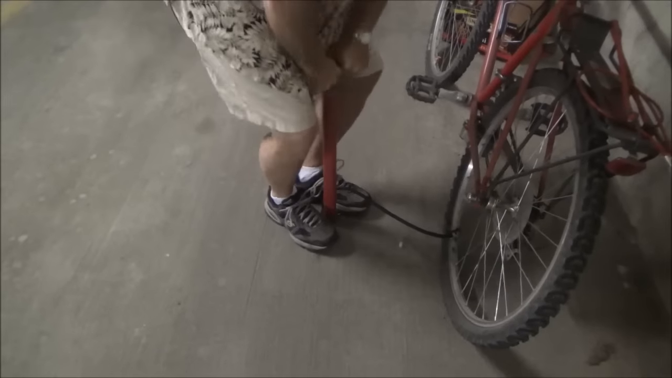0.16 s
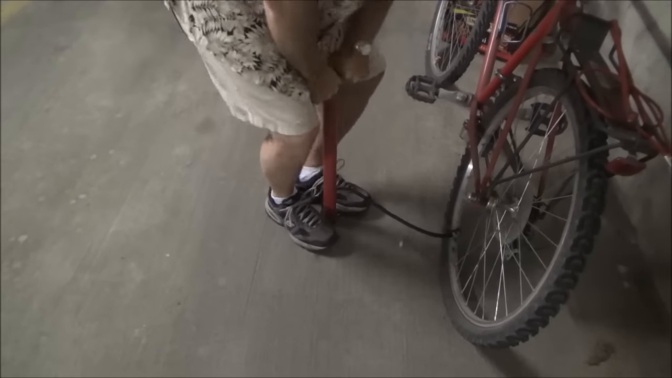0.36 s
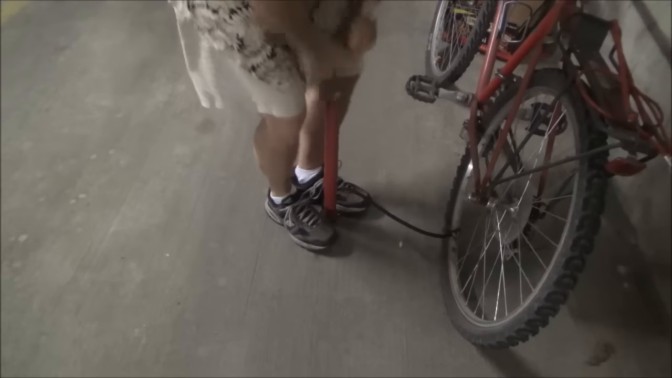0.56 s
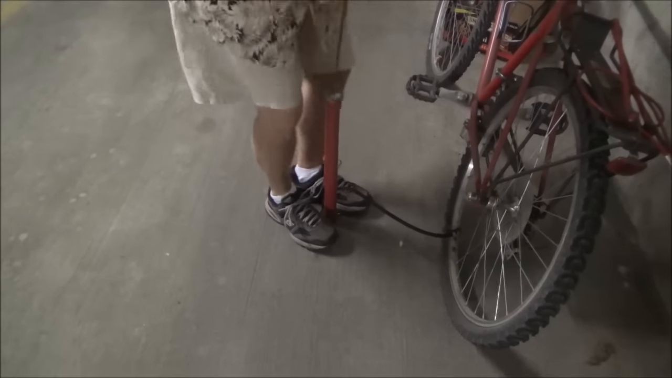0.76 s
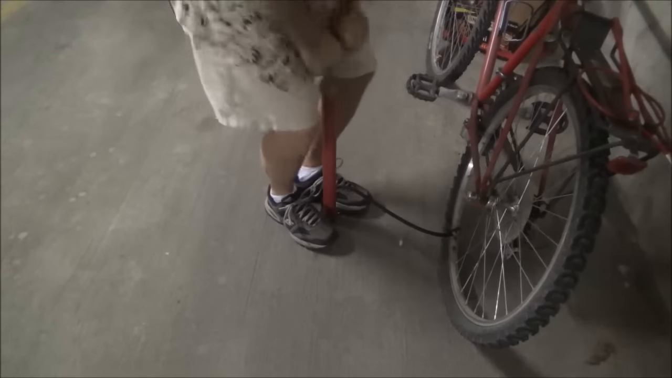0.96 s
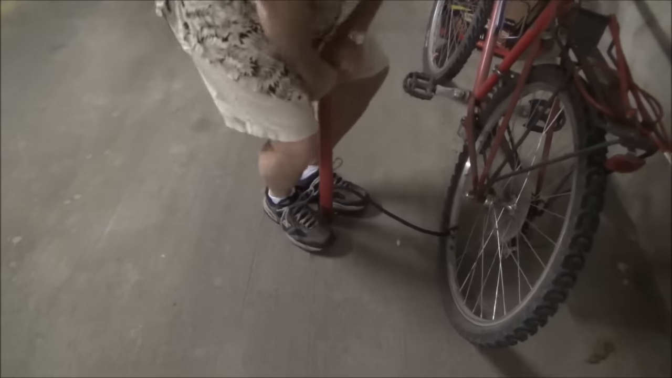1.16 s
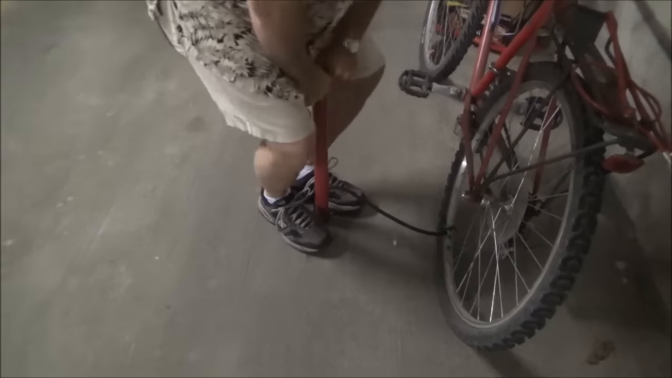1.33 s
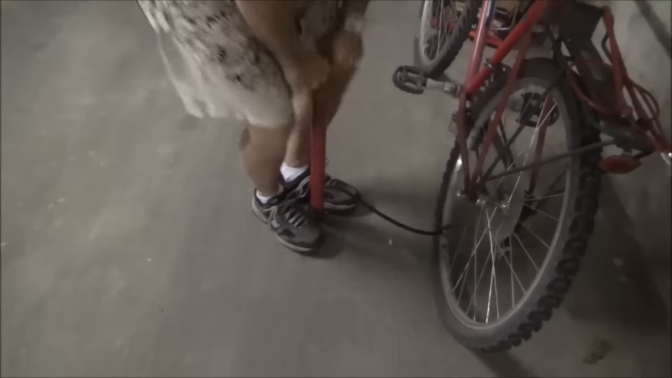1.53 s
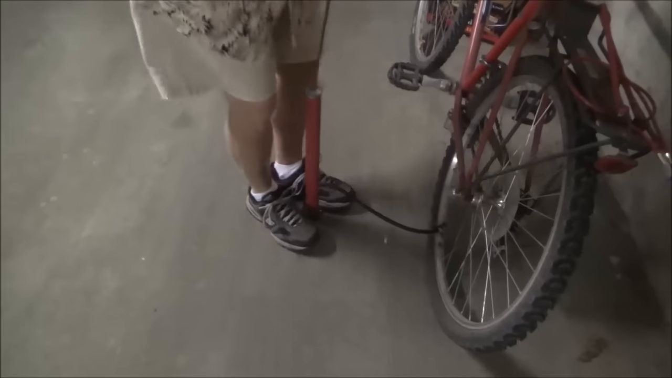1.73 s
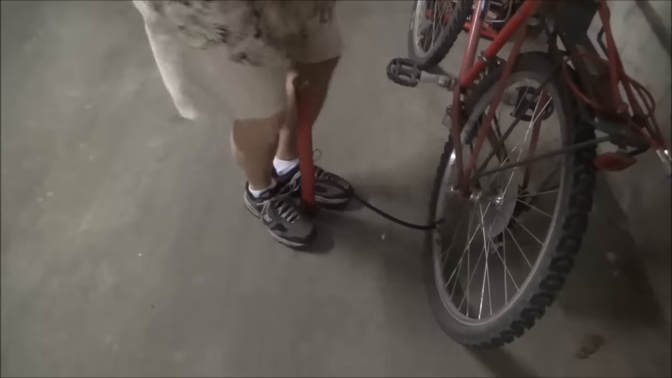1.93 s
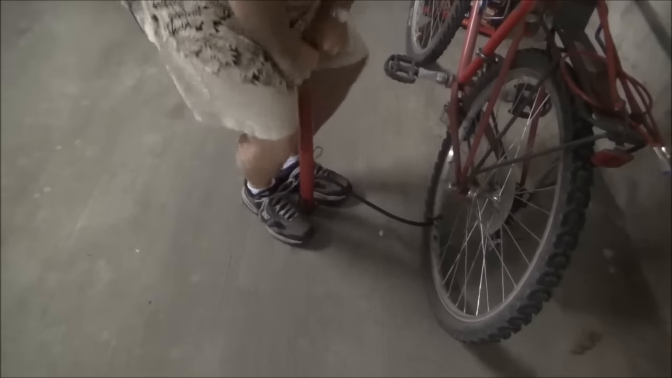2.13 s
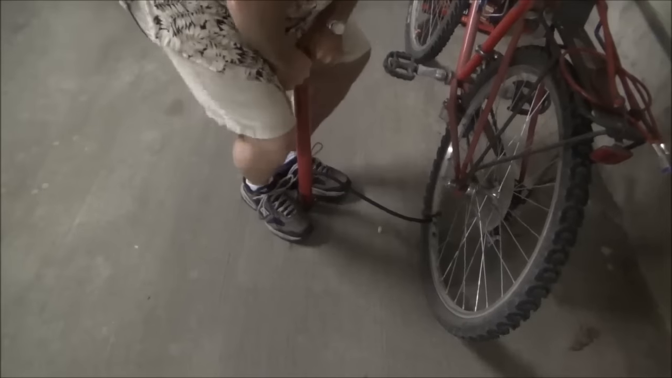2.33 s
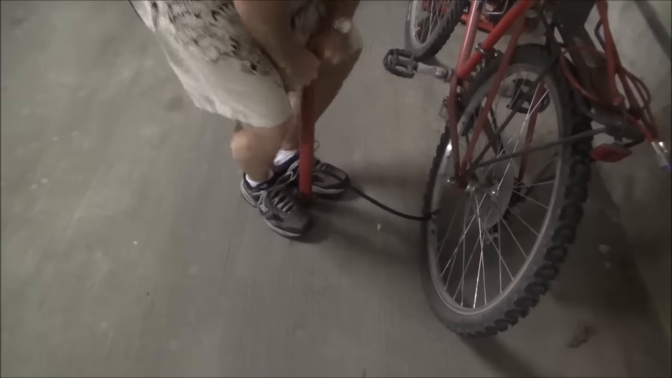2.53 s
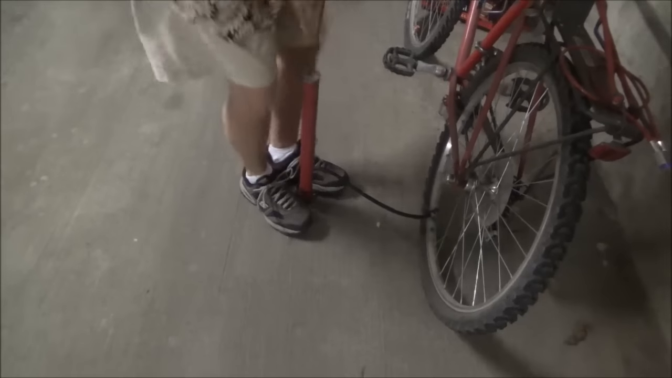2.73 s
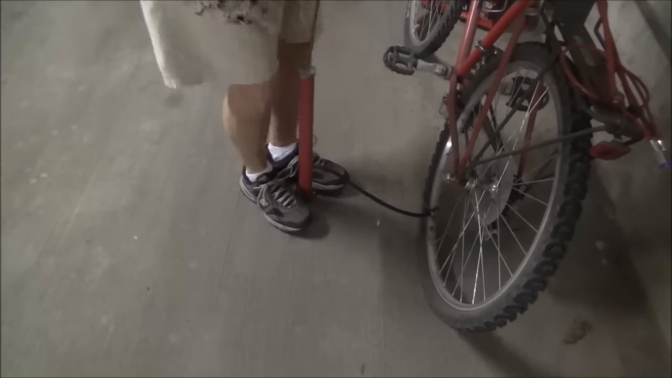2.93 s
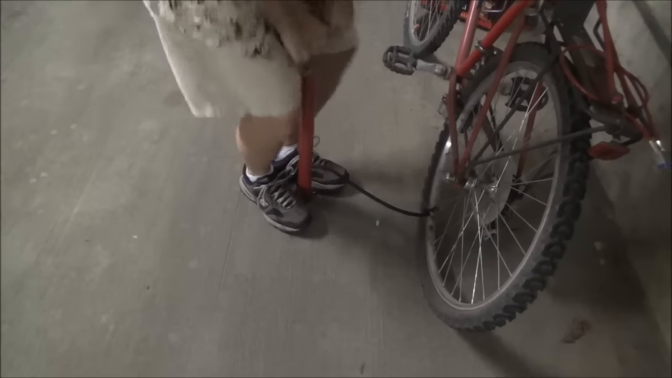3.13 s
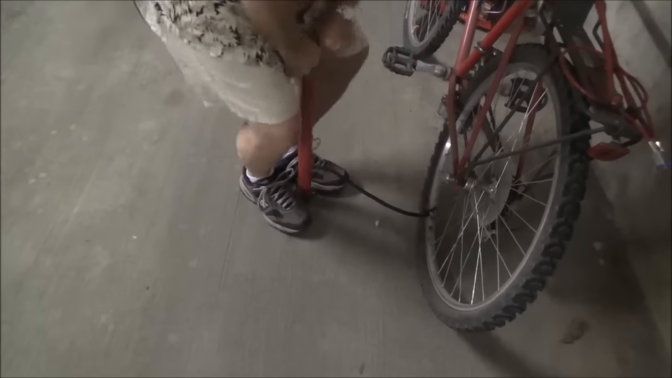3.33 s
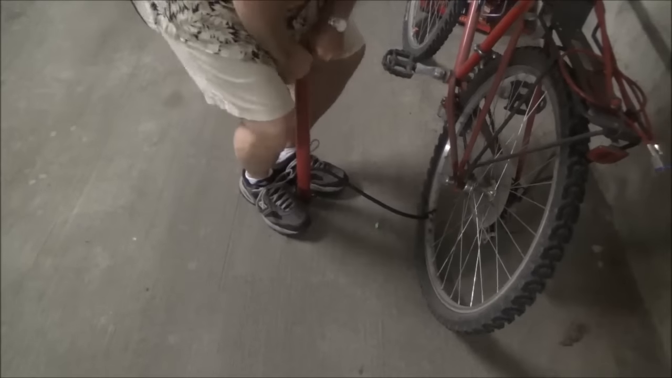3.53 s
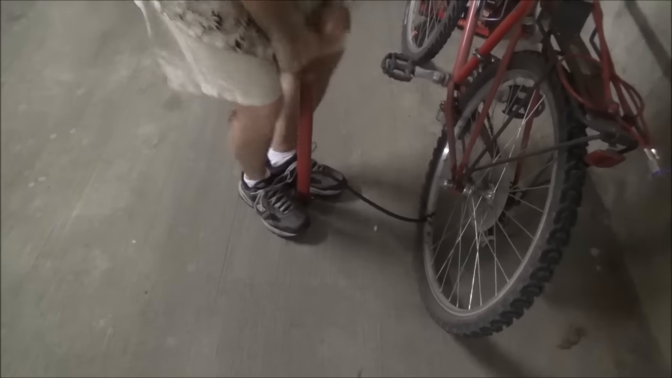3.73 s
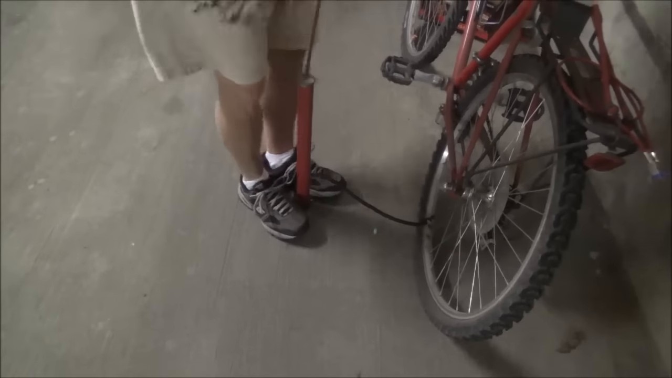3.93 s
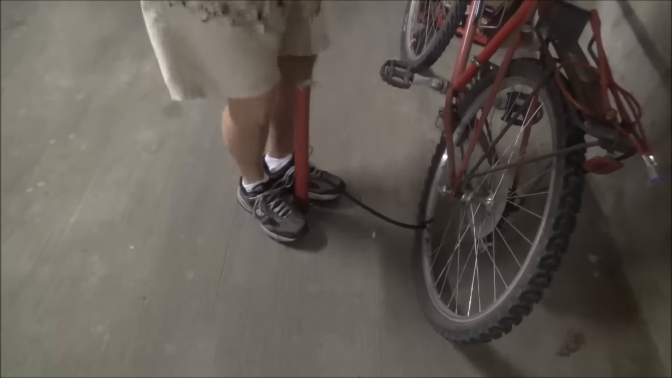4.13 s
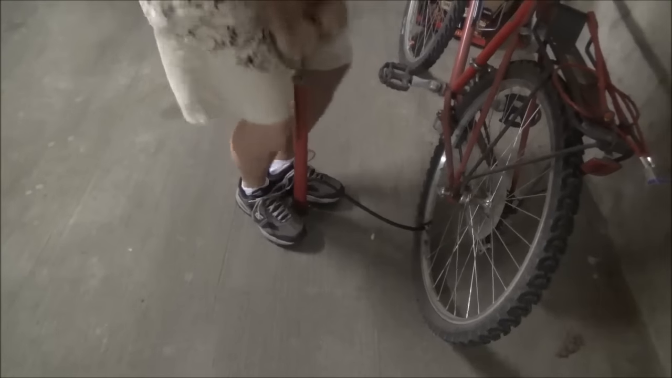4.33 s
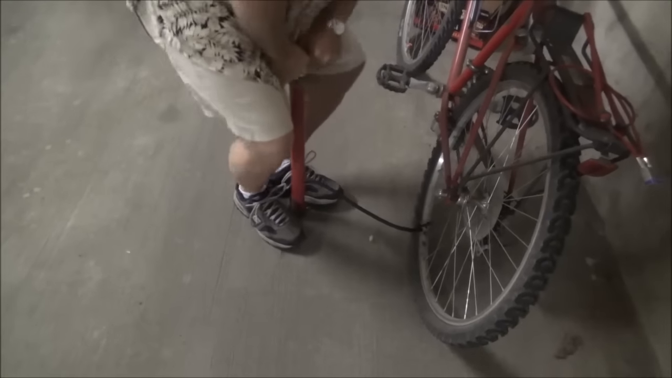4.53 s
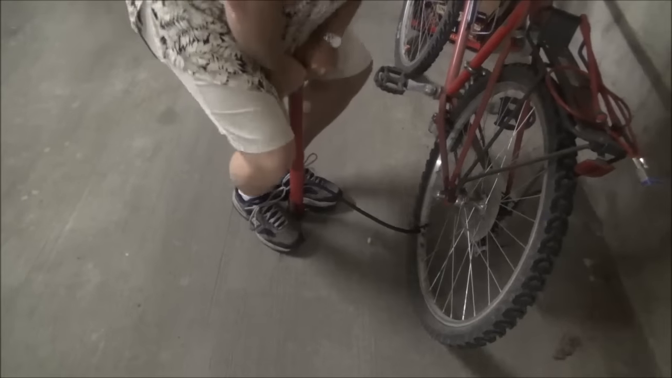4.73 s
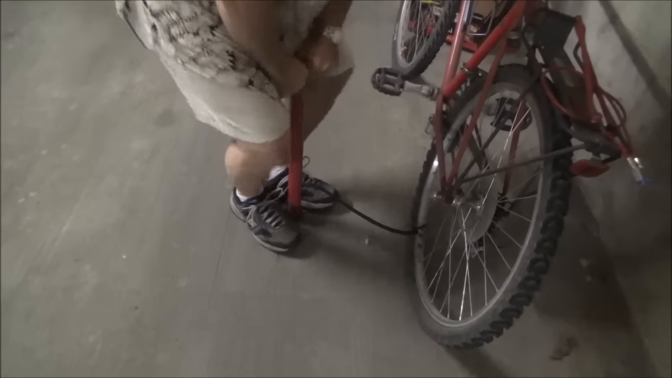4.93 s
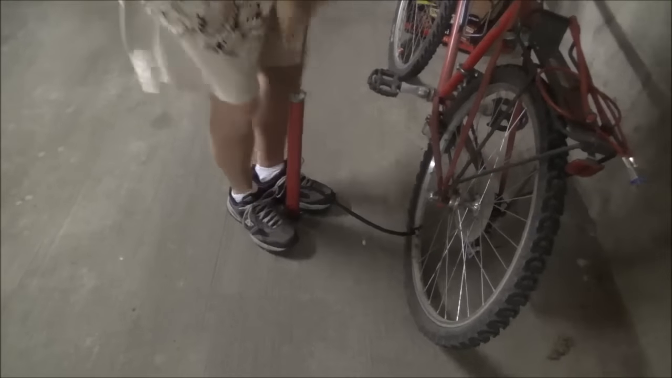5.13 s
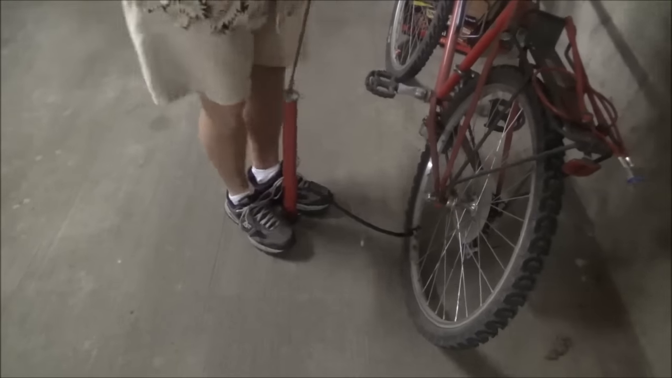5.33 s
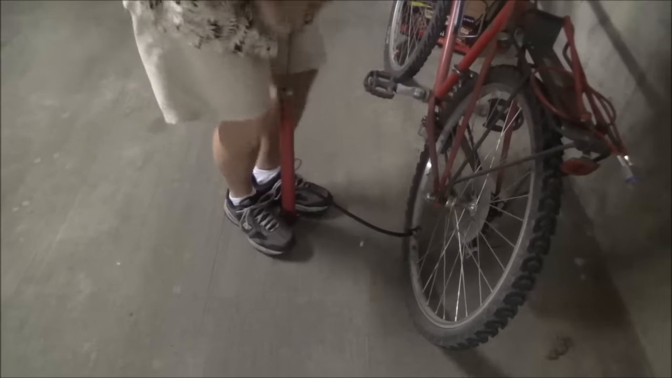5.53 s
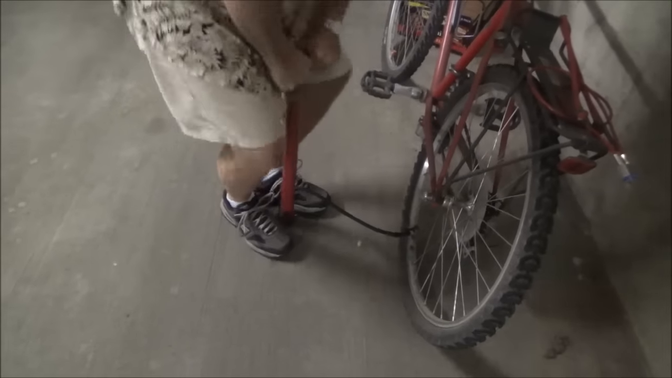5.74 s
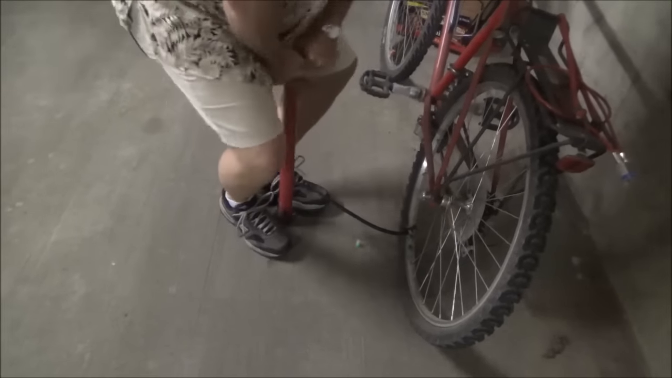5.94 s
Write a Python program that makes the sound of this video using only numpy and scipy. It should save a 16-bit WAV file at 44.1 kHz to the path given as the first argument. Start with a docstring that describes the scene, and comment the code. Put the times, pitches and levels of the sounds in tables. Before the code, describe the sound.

A steel floor pump fills a bicycle tyre, starting mid-push and followed by five full strokes. Each downstroke rubs and sizzles, then swells into sharp air hiss; each lift scrapes up the ringing barrel with small squeals and a hollow gulp. The loose rod ticks and knocks at the turns. Close stereo pickup in a bare concrete basement, short diffuse reverberation, faint low room rumble.

```python
"""Floor pump in a concrete basement

A steel pump fills a bicycle tyre: a push already under way, then five full strokes. Each push rubs and sizzles
at first while the hiss of air into the tyre swells. Each lift scrapes the piston up the ringing barrel, with a
hollow gulp of air at its fastest. The loose rod knocks, ticks and squeals. Friction is grains of noise through
resonances, air is filtered noise, and the walls add a diffuse tail."""
import sys
import numpy as np
from scipy import signal
from scipy.fft import irfft
from scipy.io import wavfile

SR = 44100
rng = np.random.default_rng(int(sys.argv[2]) if len(sys.argv) > 2 else 0)


def persist_wave(psi):
    """Save psi, clipped to +-1, as 16-bit WAV."""
    counts = np.round(np.clip(psi, -1, 1) * 32767).astype(np.int16)
    wavfile.write(sys.argv[1], SR, np.atleast_2d(counts).T)


N = 268260
TOP_HZ = 11020
T = np.arange(N) / SR
FREQS = np.maximum(np.fft.rfftfreq(4096, 1 / SR), 1)  # never 0, for the logarithms


def undb(db):
    """Decibels to gain."""
    return 10 ** (np.asarray(db) / 20)


def unit(x):
    """Scale to rms 1."""
    return x / np.sqrt(np.mean(x ** 2))


def noise():
    """White noise over the whole scene."""
    return rng.standard_normal(N)


def burst(decay):
    """Noise that starts at full level and dies away in `decay` seconds."""
    t = T[:SR // 8]
    return rng.standard_normal(len(t)) * np.exp(-t / decay)


def walk(rate):
    """Random control signal that takes a new direction `rate` times a second, rms 1."""
    steps = rng.standard_normal(4096)
    return unit(np.interp(T * rate, np.arange(len(steps)), steps))


def grains(rate, spread_db):
    """Dense tiny slips of uneven size, `rate` a second on average."""
    slipping = rng.random(N) < rate / SR
    return unit(noise() * slipping * undb(spread_db * noise()))


def shape(points):
    """Gain at every frequency from (Hz, dB) points."""
    hz, db = np.transpose(points)
    return undb(np.interp(np.log(FREQS), np.log(hz), db))


def modes(table):
    """Frequency response of a set of damped resonances."""
    return sum(undb(db) / (1 + 1j * (FREQS ** 2 - hz ** 2) / (FREQS * width)) for hz, width, db in table)


def through(x, response):
    """Filter by a frequency response, with nothing left far above TOP_HZ."""
    kernel = np.fft.fftshift(irfft(response * (FREQS < TOP_HZ + 500)))
    return signal.oaconvolve(x, kernel[1:], mode="same")


def add(track, s, sound):
    """Mix a short sound into a track from time s on."""
    start = max(int(s * SR), 0)
    part = track[start:start + len(sound)]
    part += sound[:len(part)]


def ramp(s, length):
    """Rises from 0 to 1, starting at time s."""
    return np.clip((T - s) / length, 0, 1)


def envelope(s, attack, hold, fade):
    """Straight attack from time s, full level until `hold` after s, then an exponential fade."""
    return ramp(s, attack) * np.exp(-np.maximum(T - s - hold, 0) / fade)


# Building air spectrum. Each row: frequency in Hz, relative level in dB.
BASEMENT_SPECTRUM = [(25, -34), (50, -18), (70, -9), (95, -20), (155, 5), (195, -1), (260, 4), (400, 2),
                     (700, -0.5), (2000, -4.5), (5000, -20), (11000, -58)]
# Slow swell of the building's rumble. Each row: time in seconds, level in dB.
RUMBLE = [(0, -53), (.9, -57.5), (1.6, -64), (3.3, -64), (3.75, -56), (4.4, -64), (6.08, -64)]


def basement(air_db=-47.5, hum_hz=122, hum_db=-65, waver_db=2, rumble_hz=85, rumble_width_hz=80):
    """Steady air of the building, a slowly swelling rumble and a faint hum that wavers in level."""
    air = undb(air_db) * unit(through(noise(), shape(BASEMENT_SPECTRUM)))
    hum = np.sqrt(2) * np.sin(2 * np.pi * hum_hz * T) * undb(hum_db + waver_db * walk(4.53))
    rumble = unit(through(noise(), modes([(rumble_hz, rumble_width_hz, 0)]) ** 2))
    return air + rumble * undb(np.interp(T, *np.transpose(RUMBLE))) + hum


LAST_PUSH_ENDS_S = 6.22


def push_spans():
    """Start and end of each push: it lasts until the next lift."""
    starts = [row[0] for row in PUSHES]
    ends = [row[0] for row in LIFTS] + [LAST_PUSH_ENDS_S]
    return list(zip(starts, ends))


def air_column(x, echo, long_m=.5, short_m=0.1457):
    """Sound runs up and down the air above the piston: a comb of resonances that rises with the handle."""
    length = np.interp(T, np.ravel(push_spans()), [short_m, long_m] * len(PUSHES))
    trip = 2 * length / 343  # there and back at the speed of sound in m/s
    return sum(echo ** k * np.interp(T - k * trip, T, x) for k in range(4))


# Handle going down. Each row: start in seconds, time to build full pressure in seconds, hiss level in dB,
# seal rub level in dB, seal sizzle level in dB (all relative).
PUSHES = [(-.07, 0.23, -25, -40.5, -32.5), (0.887, 0.27, -25, -34.5, -35), (1.898, 0.32, -24, -32.5, -30),
          (2.942, 0.37, -24, -34, -33.5), (4.091, 0.49, -24, -37, -48), (5.423, 0.43, -24.5, -39.5, -39)]
# Resonances of the steel barrel and rod. Each row: frequency in Hz, width in Hz, relative level in dB.
BARREL = [(800, 133, -3), (1370, 113, 0), (1680, 74, -10.5), (2095, 85, 3.5), (2290, 280, -8),
          (2695, 64, 2), (3165, 85, -6), (3530, 160, 0), (4120, 124, 3), (5076, 62, 1), (6390, 190, -1.5),
          (8140, 370, -7.5), (9650, 170, -8), (10575, 70, 3)]
# Seal rub spectrum. Each row: frequency in Hz, relative level in dB.
RUB_SPECTRUM = [(150, -4.5), (450, 8), (700, 2), (1150, 4.5), (2200, 2), (3200, 2.5), (4200, 3.5),
                (5500, 1), (11000, -5)]
# Resonances of air leaking past the seal. Each row: frequency in Hz, width in Hz, relative level in dB.
SEAL = [(11500, 150, -1.5), (10740, 62, 5.5), (10180, 56, 2.5)]
# the rub fades right after its attack, the sizzle once full pressure is reached
SEAL_ATTACK_S, RUB_FADE_S, SIZZLE_FADE_S = 0.024, 0.32, 0.079


def push(rub_db=0, sizzle_db=0, ring_db=3, rough_db=1.5, sputter_db=4.5):
    """The seal rubs down the wall while squeezed air sizzles past it."""
    slips = air_column(grains(rate=9000, spread_db=2.5), echo=0.13) * undb(rough_db * walk(80))
    rub = unit(through(slips, shape(RUB_SPECTRUM) * (1 + undb(ring_db) * modes(BARREL))))
    leak = grains(rate=2500, spread_db=1.5)
    sizzle = unit(through(leak, modes(SEAL))) * undb(sputter_db * walk(30))
    rubbing = sum(undb(db) * envelope(s, SEAL_ATTACK_S, SEAL_ATTACK_S, RUB_FADE_S) for s, _, _, db, _ in PUSHES)
    leaking = sum(undb(db) * envelope(s, SEAL_ATTACK_S, build, SIZZLE_FADE_S) for s, build, _, _, db in PUSHES)
    return undb(rub_db) * rub * rubbing + undb(sizzle_db) * sizzle * leaking


# the flow starts weak, swells with the pressure, holds, drops as the handle slows, then the hose bleeds off
CRACK_DB, OPEN_S, SLOWING_S, SLOWING_DB, BLEED_S = -18.5, 0.034, 0.12, -13, 0.11


def airflow():
    """Air through the valve: it swells as pressure builds and drops as the handle nears the bottom."""
    flow = 0
    for (s, build, db, _, _), (_, end) in zip(PUSHES, push_spans()):
        unbuilt = np.cos(np.pi / 2 * ramp(s, build)) ** 2
        level_db = db + CRACK_DB * unbuilt + SLOWING_DB * ramp(end - SLOWING_S, SLOWING_S)
        flow = flow + undb(level_db) * envelope(s - OPEN_S, OPEN_S, end - s + OPEN_S, BLEED_S)
    return flow


# Air hiss spectrum. Each row: frequency in Hz, relative level in dB.
HISS_SPECTRUM = [(60, -67), (200, -68), (700, -22), (1400, -18.5), (2600, -17), (4400, -13), (5500, -9.5),
                 (6900, -10), (7800, -3.5), (9000, -1.5), (10300, 2.5), (11000, 0)]


def valve(hiss_db=3.0, flutter_db=0.33, hose_echo=0.15, hose_s=.0021, weak_dull=0.65):
    """Turbulent jet through the hose into the tyre, brighter the harder it blows."""
    flow = airflow() + undb(-105)  # never 0, for the division
    hose = 1 + hose_echo * np.exp(-2j * np.pi * FREQS * hose_s)
    jet = unit(through(noise(), shape(HISS_SPECTRUM) * hose)) * undb(flutter_db * walk(150))
    low = through(jet, 1 / (1 + (FREQS / 5000) ** 4))
    low_boost = (flow.max() / flow) ** weak_dull - 1
    return undb(hiss_db) * flow * (jet + low * low_boost)


def squeaks(count=1600, centre_hz=2900, octaves=.45, length=0.00459, glide=0.0256):
    """Stick and slip: brief gliding squeaks, each with its own pitch and strength."""
    out, t = np.zeros(N), T[:SR // 20] - .025
    starts = rng.uniform(0, T[-1], count)
    chances = np.clip(rng.standard_normal((count, 3)), -2, 2)
    for s, (pitch, bend, size) in zip(starts, chances):
        hz = min(centre_hz * 2 ** (octaves * pitch), TOP_HZ) * (1 + glide * bend * t / length / 2)
        add(out, s, np.exp(size / 2 - (t / length) ** 2) * np.sin(2 * np.pi * np.cumsum(hz) / SR))
    return unit(out)


def wander(x):
    """The ringing wavers in pitch by a percent or two as the piston slides."""
    fine = signal.resample_poly(x, 4, 1)  # oversampled so the moving read stays clean
    return np.interp(T + .0004 * walk(25), np.arange(4 * N) / (4 * SR), fine)


# Handle coming up. Each row: start in seconds, time to top speed in seconds, scrape level in dB,
# gulp level in dB, gulp half length in seconds (levels relative).
LIFTS = [(0.543, 0.19, -30, -44.5, 0.085), (1.554, .19, -30, -36.5, 0.042),
         (2.625, 0.22, -30, -40.5, 0.071), (3.731, 0.24, -30, -36, 0.049), (4.991, 0.27, -31.5, -34, 0.041)]
# Scrape spectrum. Each row: frequency in Hz, relative level in dB.
SCRAPE_SPECTRUM = [(150, -30), (800, -1), (2000, -3), (4200, 1), (6000, 0.5), (11000, 5.5)]
# the scrape sets in quickly, holds until top speed, fades toward the top and stops at the next push
SCRAPE_ATTACK_S, SCRAPE_FADE_S, STOP_S = 0.039, 0.12, 0.018


def lift(scrape_db=-2, rough_db=2, broad_db=-13, squeak_db=-7, shift_db=3.5):
    """The piston scrapes up in tiny slips, squeaking at speed; each barrel mode swells and fades by itself."""
    slips = air_column(grains(rate=9000, spread_db=0.0), echo=0.37) * undb(rough_db * walk(90))
    slips = through(slips, shape(SCRAPE_SPECTRUM))
    ring = sum(through(slips, modes([mode])) * undb(shift_db * walk(28)) for mode in BARREL)
    scrape = wander(unit(ring + undb(broad_db) * slips))
    speed = 0
    for (s, fastest, db, _, _), following in zip(LIFTS, PUSHES[1:]):
        moving = envelope(s, SCRAPE_ATTACK_S, fastest, SCRAPE_FADE_S)
        speed = speed + undb(db) * moving * (1 - ramp(following[0], STOP_S))
    squeaky = undb(squeak_db) * squeaks() * speed / speed.max()
    return undb(scrape_db) * (scrape + squeaky) * speed


# Dull taps as the seal flips over and the base rocks. Each row: start in seconds, relative level in dB, pitch in Hz.
TAPS = [(.575, -37, 400), (1.57, -34.5, 398), (2.643, -36.5, 402), (3.766, -39, 423), (5.027, -35.5, 424),
        (5.402, -39.5, 920), (5.892, -34, 710)]


def taps(tap_db=-12, decay=0.014, width_hz=110):
    """Soft contacts that ring for a few cycles."""
    out = np.zeros(N)
    for s, db, hz in TAPS:
        add(out, s, undb(db + tap_db) * unit(through(burst(decay), modes([(hz, width_hz, 0)]))))
    return out


# Small sharp ticks of rod and handle. Each row: start in seconds, relative level in dB.
TICKS = [(0.596, -16.5), (.641, -18), (.958, -17), (0.986, -12), (1.753, -21), (1.796, -21.5), (2.027, -14),
         (2.699, -15), (2.744, -19), (2.992, -17), (3.071, -11.5), (3.989, -22.5), (4.096, -10.5),
         (4.122, -14), (4.178, -23), (4.218, -17.5), (5.42, -14.5), (5.46, -15)]
# Tick spectrum. Each row: frequency in Hz, relative level in dB.
TICK_SPECTRUM = [(100, -30), (1200, -25), (2500, -8), (6500, -6), (8200, 6), (9400, 1), (10500, 14)]


def ticks(tick_db=2, decay=0.0089, ring_db=0, snap_db=14):
    """Light metal contacts, each a sharp snap and a few milliseconds of bright buzz."""
    blows = np.zeros(N)
    for s, db in TICKS:
        buzz = burst(decay)
        snap = undb(snap_db) * signal.unit_impulse(len(buzz))
        add(blows, s, undb(db) * (buzz + snap))
    colour = shape(TICK_SPECTRUM) * (1 + undb(ring_db) * modes(BARREL))
    return undb(tick_db) * through(blows, colour / np.sqrt(np.mean(np.abs(colour) ** 2)))


# Rod and seal squeals. Each row: middle in seconds, relative level in dB, half length in seconds,
# pitch in Hz, glide in octaves per second.
SQUEALS = [(0.601, -29, 0.015, 2166, 1.5), (0.629, -26, .009, 3660, 0.5), (0.651, -30.5, 0.01, 2060, 5.5),
           (0.666, -28, .007, 3600, 0.5), (0.872, -39, 0.024, 3400, -8.5), (0.929, -32, 0.014, 1846, -22.5),
           (1.587, -32.5, .01, 2080, -0.5), (2.658, -36, .012, 2100, 2.5), (2.725, -23.5, 0.004, 2080, 0.5),
           (3.78, -28.5, .012, 2070, 2), (3.915, -33, 0.011, 3390, -2), (5.056, -31, .025, 2105, 1.5),
           (5.089, -34, 0.02, 3850, -12.5), (5.129, -25.5, 0.011, 2056, -0.5),
           (5.146, -26.5, 0.012, 3590, 3), (5.186, -30, .009, 5150, 2)]


def squeals(squeal_db=0, waver_hz=55, rough_db=3, slip_hz_per_glide=22):
    """Stick and slip locks onto one pitch for a moment; the faster it slides away, the scratchier it gets."""
    out = 0
    for s, db, length, centre_hz, glide in SQUEALS:
        gliding_hz = centre_hz * 2 ** (glide * np.clip(T - s, -.05, .05))
        scratch_hz = slip_hz_per_glide * abs(glide) * walk(600)
        hz = gliding_hz + waver_hz * walk(150) + scratch_hz
        out = out + undb(db) * np.exp(-((T - s) / length) ** 2) * np.sin(2 * np.pi * np.cumsum(hz) / SR)
    return undb(squeal_db + rough_db * walk(180)) * out


# The rod knocks in its guide. Each row: hardest contact in seconds, relative level in dB, chatter length in seconds,
# brightness in dB per octave, pitch that is favoured in Hz.
KNOCKS = [(.629, -26.5, 0.0059, 3.5, 4100), (1.21, -20.5, 0.0025, 0.5, 4270),
          (1.659, -33.5, 0.003, -9, 2100), (1.764, -28.5, 0.019, -6.5, 820), (1.908, -20, 0.0014, -4, 2160),
          (1.992, -20, 0.0063, -1.5, 4200), (2.726, -36, 0.0087, -7, 2080), (2.82, -19.5, 0.0057, -2, 2100),
          (2.995, -23, 0.0084, -1.5, 2620), (3.776, -29, 0.003, 0, 2080), (3.848, -33, 0.0016, -2, 4100),
          (3.953, -27.5, 0.012, -2, 6400), (4.099, -19.5, 0.0048, 3.5, 1980),
          (5.231, -24, 0.0079, -1.5, 2100), (5.523, -19, 0.0019, -3.5, 3580),
          (5.738, -25.5, 0.0032, -6.5, 1400)]


def knocks(knock_db=0, broad_db=-19, vary_db=4.0, low_hz=760, top_hz=6000, rise=0.42,
           favour_db=3, favour_octaves=0.21):
    """One hard contact inside a chatter of small ones; where it lands decides which modes ring most."""
    out, t = np.zeros(N), T[:SR // 5] - T[SR // 10]
    contact = 1 / (1 + (low_hz / FREQS) ** 2) / (1 + 1j * FREQS / top_hz)
    blow = .36 * (t == 0)
    for s, db, length, tilt_db, ring_hz in KNOCKS:
        struck = [(hz, width, gain + vary_db * rng.standard_normal()) for hz, width, gain in BARREL]
        body = modes(struck) + undb(broad_db)
        tilt = tilt_db * np.log2(np.maximum(FREQS, BARREL[0][0]))
        favour = favour_db * np.exp(-(np.log2(FREQS / ring_hz) / favour_octaves) ** 2)
        chatter = rng.standard_normal(len(t)) * np.exp(-np.maximum(t, -t / rise) / length)
        ring = through(chatter / np.linalg.norm(chatter) + blow, body * contact * undb(tilt + favour))
        # longer chatter carries more energy
        add(out, s + t[0], undb(db + knock_db) * ring * np.sqrt(2 * length * SR) / np.linalg.norm(ring))
    return out


# Rasps around one pitch: mostly the seal catching, while the rows near 2.0 s give the rod's knock there its
# fuller body. # Each row: middle in seconds, relative level in dB, half length in seconds, pitch in Hz.
SCUFFS = [(0.646, -27.5, 0.042, 4030), (0.925, -35.5, 0.045, 3580), (1.73, -34.5, 0.034, 3400),
          (1.998, -20, 0.0082, 1500), (2.025, -33, 0.025, 1700), (2.045, -36.5, 0.075, 530),
          (2.801, -31, 0.062, 4440), (3.81, -36, 0.045, 2100), (3.915, -33.5, 0.05, 4100),
          (4.283, -33, 0.037, 2930), (5.175, -31, 0.075, 3800), (5.544, -40, 0.13, 850)]


def scuffs(scuff_db=0, width=0.92, ring_db=4):
    """Short gritty rasps that ring the barrel a little, as wide as a share of their pitch."""
    out, t = np.zeros(N), T[:SR // 2] - .25
    for s, db, length, hz in SCUFFS:
        slips = grains(rate=3500, spread_db=2)[:len(t)]
        colour = modes([(hz, width * hz, 0)]) ** 2 * (1 + undb(ring_db) * modes(BARREL))
        rasp = unit(through(slips, colour))
        add(out, s + t[0], undb(db + scuff_db) * rasp * np.exp(-(t / length) ** 2))
    return out


# Resonances of the air intake. Each row: frequency in Hz, width in Hz, relative level in dB.
INTAKE = [(253, 63, -2), (324, 133, 5.5)]


def intake(gulp_db=0):
    """Fresh air is drawn past the seal with a hollow gulp when the lift is fastest."""
    swell = sum(undb(db) / (1 + ((T - s - fastest) / length) ** 2) for s, fastest, _, db, length in LIFTS)
    return undb(gulp_db) * swell * unit(through(noise(), modes(INTAKE) ** 2))


# The rod rattles on after a knock. Each row: start in seconds, level in dB.
RATTLES = [(2.83, -37), (3.0, -38), (4.105, -34.5), (5.53, -36.5)]


def rattles(centre_hz=2250, width_hz=750, fade=.1):
    """After a hard knock the loose rod keeps bouncing in its guide."""
    bounces = unit(through(grains(rate=900, spread_db=1), modes([(centre_hz, width_hz, 0)]) ** 2))
    return bounces * sum(undb(db) * (T > s) * np.exp(-np.maximum(T - s, 0) / fade) for s, db in RATTLES)


# The valve chirps once as it shuts. The one row: middle in seconds, half length in seconds, start pitch in Hz,
# end pitch in Hz, level in dB.
CHIRP = (3.689, .012, 7860, 7740, -21)


def chirp(waver_hz=45):
    """The closing valve whistles on a falling, wavering pitch."""
    s, length, start_hz, end_hz, db = CHIRP
    hz = np.interp(T, [s - length, s + length], [start_hz, end_hz]) + waver_hz * walk(180)
    return undb(db) * np.exp(-((T - s) / length) ** 2) * np.sqrt(2) * np.sin(2 * np.pi * np.cumsum(hz) / SR)


def concrete(x, wet_db=-10, t60=0.65, dull_hz=4500):
    """Diffuse tail of bare walls, weaker in the treble."""
    t = T[:SR]
    tail = rng.standard_normal(SR) * undb(-60 * t / t60) * (1 - np.exp(-t / 0.0013))
    tail = through(tail / np.linalg.norm(tail), 1 / (1 + 1j * FREQS / dull_hz))
    return undb(wet_db) * signal.fftconvolve(x, tail)[:N]


# Scattered side signal. Each row: frequency in Hz, side minus mid in dB.
SIDE_DB = [(30, -20), (70, -9), (140, -7), (300, -12), (1000, -17), (4300, -14.5), (8000, -14)]
# Balance of the two ports. Each row: frequency in Hz, left minus right in dB.
LEAN_DB = [(70, -9), (280, -2.5), (600, -1.5), (1200, -1.1), (3000, -1.5), (9000, -1)]


def ports(mid, diffuse, spread_s=0.011):
    """Near reflections and diffuse sound differ between two close microphone ports; the right hears more."""
    scatter = burst(spread_s)
    reflections = signal.oaconvolve(mid, scatter / np.linalg.norm(scatter))[:N]
    side = diffuse + through(reflections, shape(SIDE_DB))
    lean = np.sqrt(shape(LEAN_DB))  # half the difference on each side
    return np.array([through(mid + side, lean), through(mid - side, 1 / lean)])


def scene(side_wet_db=-9, side_rumble_db=-65):
    """The pump and the valve in the basement, heard in stereo."""
    air = valve() + intake() + chirp()
    friction = push() + lift() + squeals() + scuffs()
    contacts = taps() + ticks() + knocks() + rattles()
    pump = air + friction + contacts
    side_rumble = unit(through(noise(), modes([(85, 140, 0)]) ** 2))
    diffuse = undb(side_wet_db) * concrete(pump) + undb(side_rumble_db) * side_rumble
    return ports(pump + concrete(pump) + basement(), diffuse)


def record(dry):
    """A steep low-pass cuts off the top of the treble."""
    return signal.sosfilt(signal.ellip(14, .1, 80, TOP_HZ, fs=SR, output="sos"), dry)


dry = scene()
out = record(dry)
persist_wave(out)
```